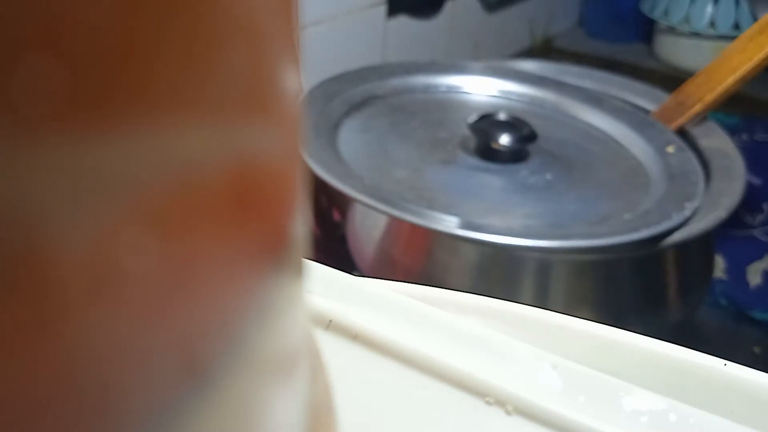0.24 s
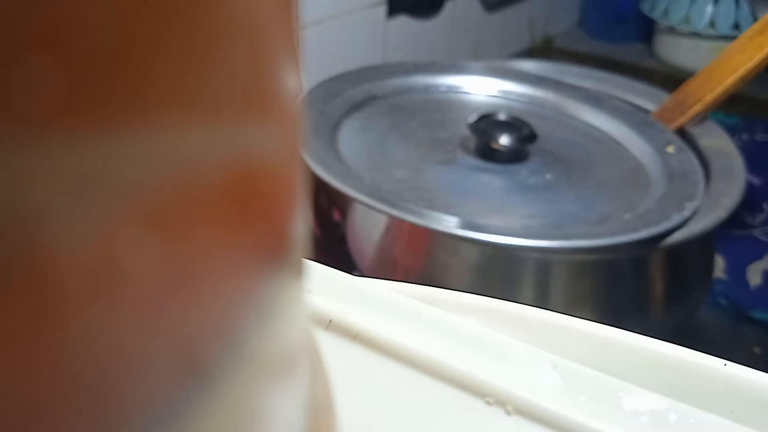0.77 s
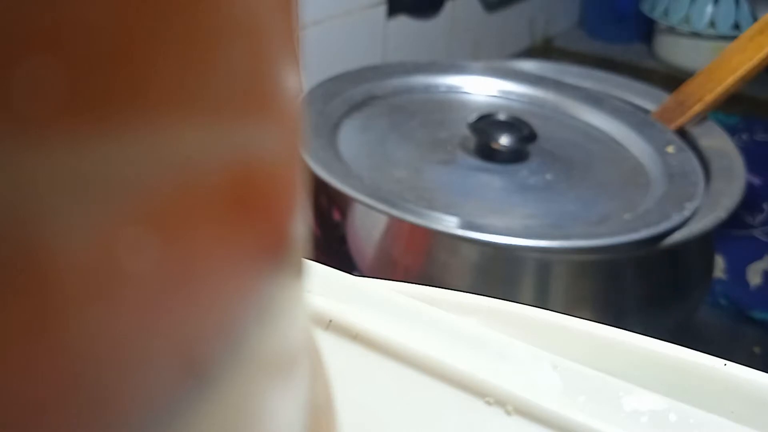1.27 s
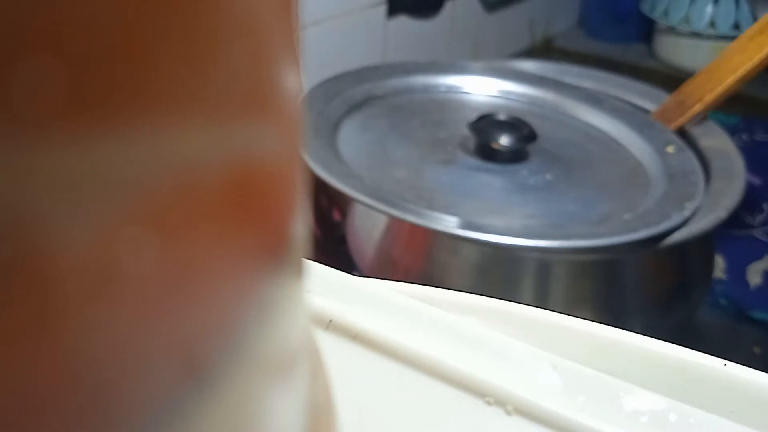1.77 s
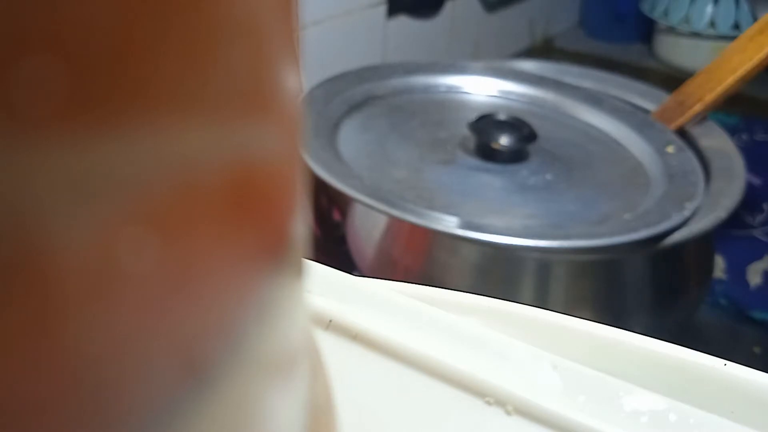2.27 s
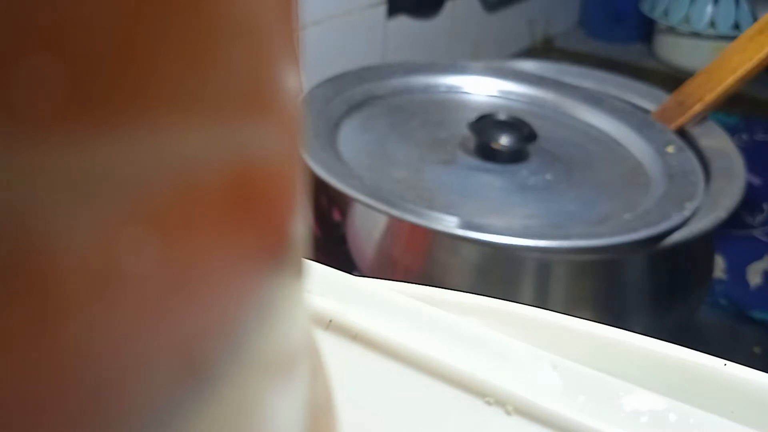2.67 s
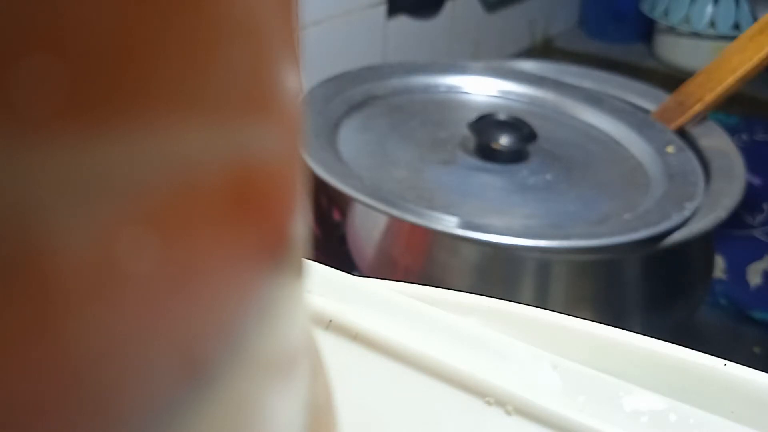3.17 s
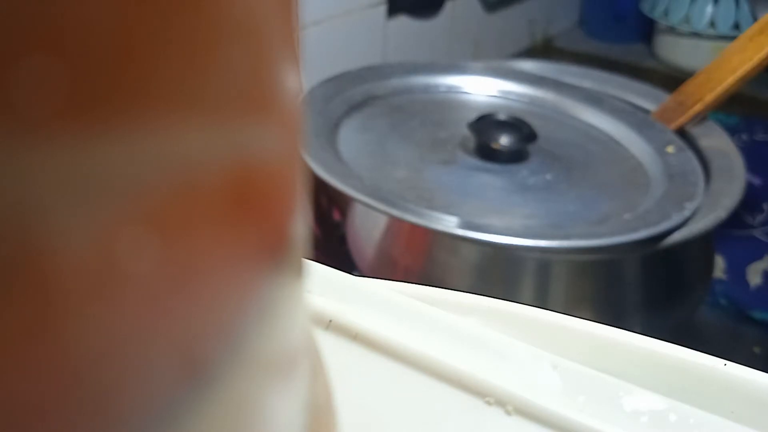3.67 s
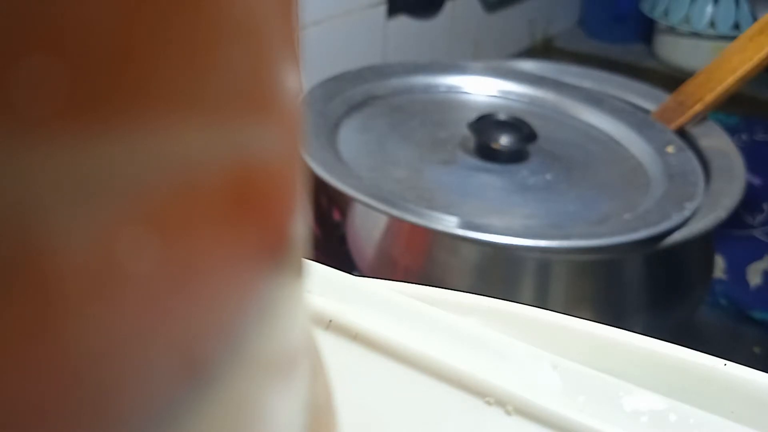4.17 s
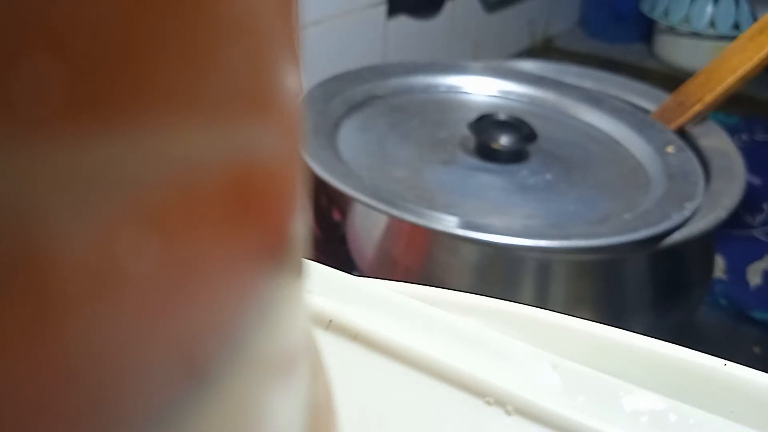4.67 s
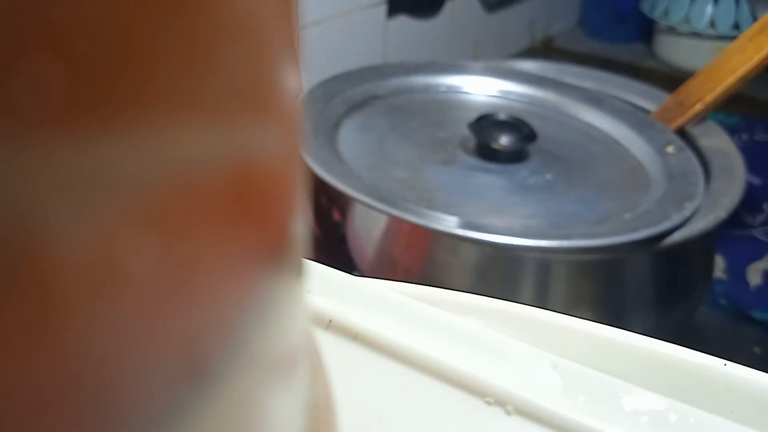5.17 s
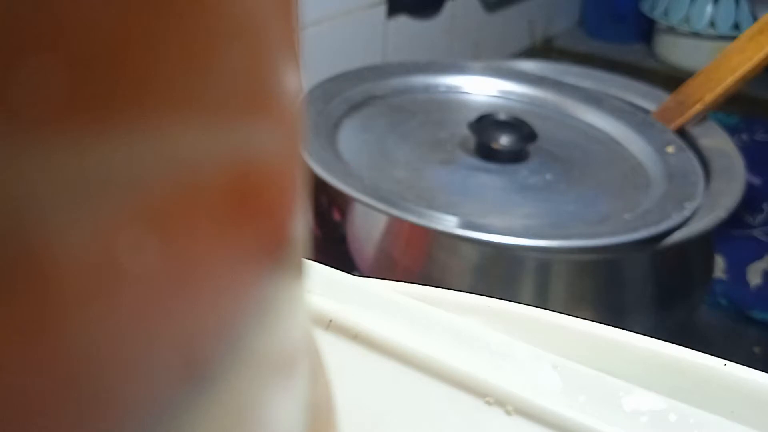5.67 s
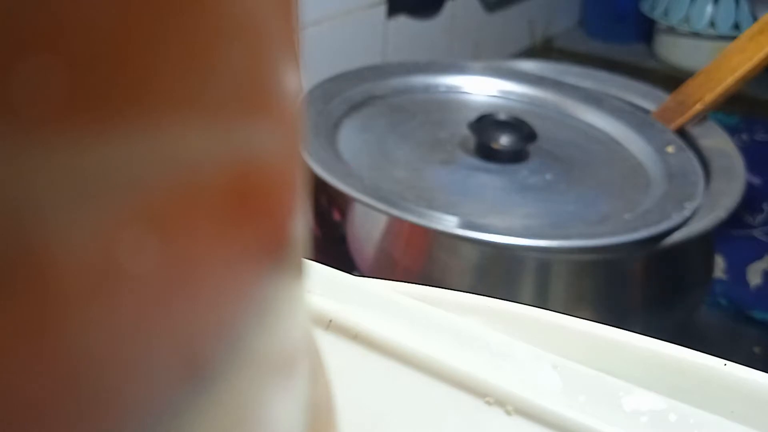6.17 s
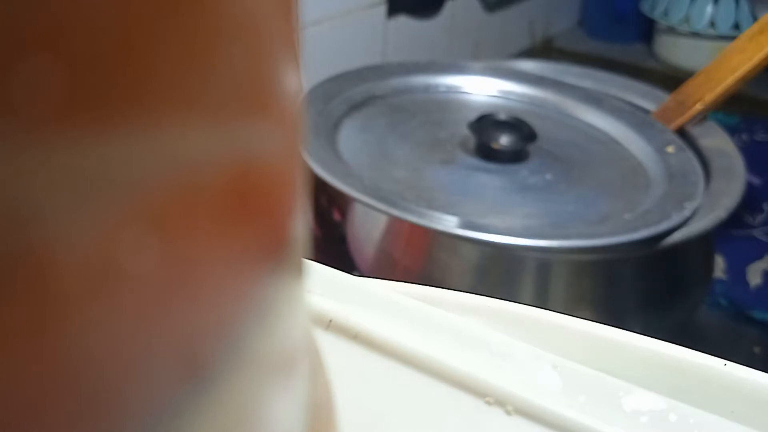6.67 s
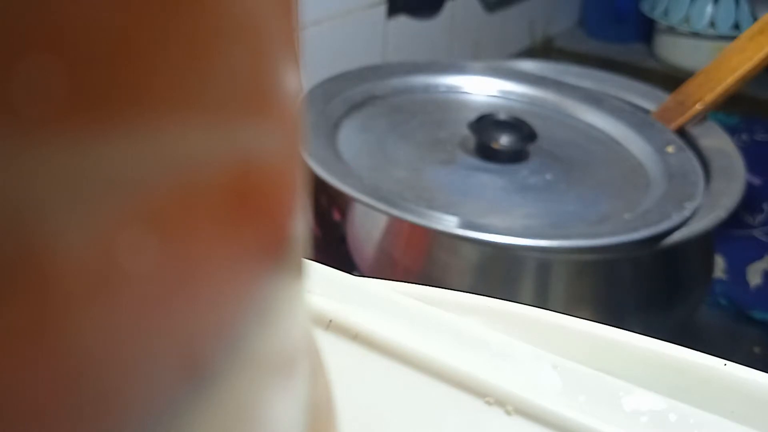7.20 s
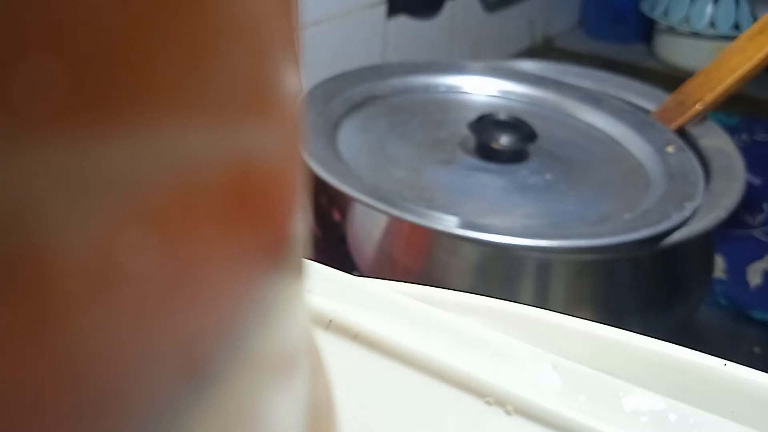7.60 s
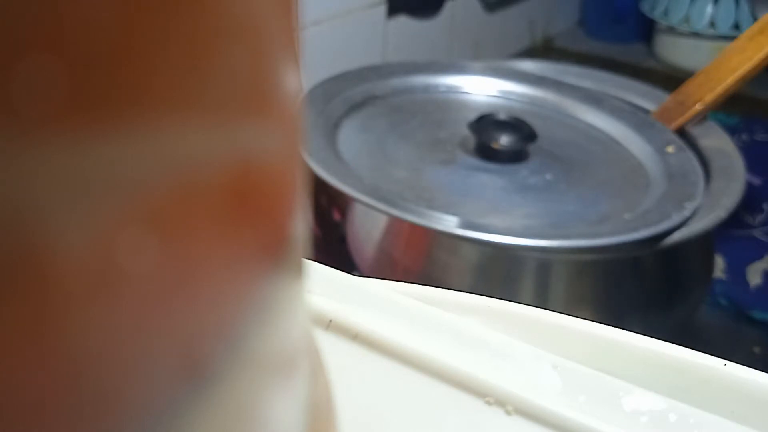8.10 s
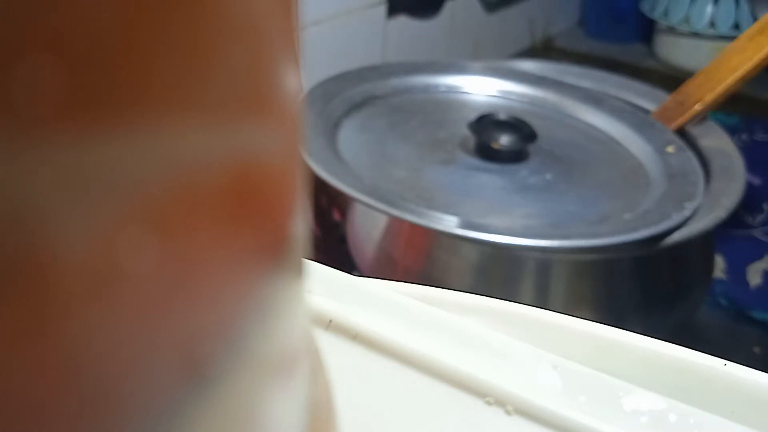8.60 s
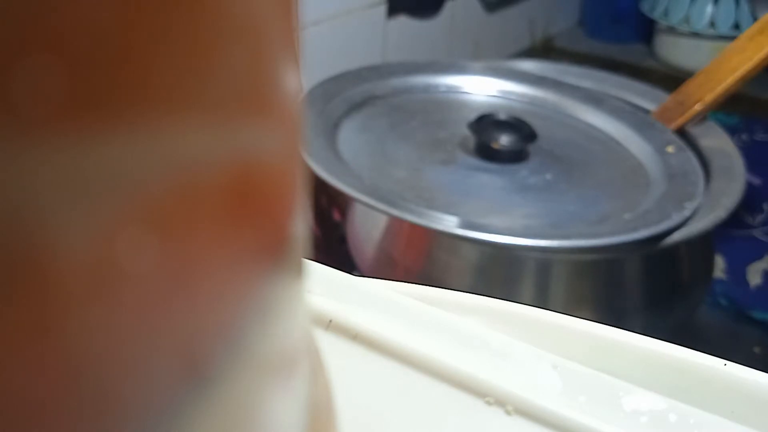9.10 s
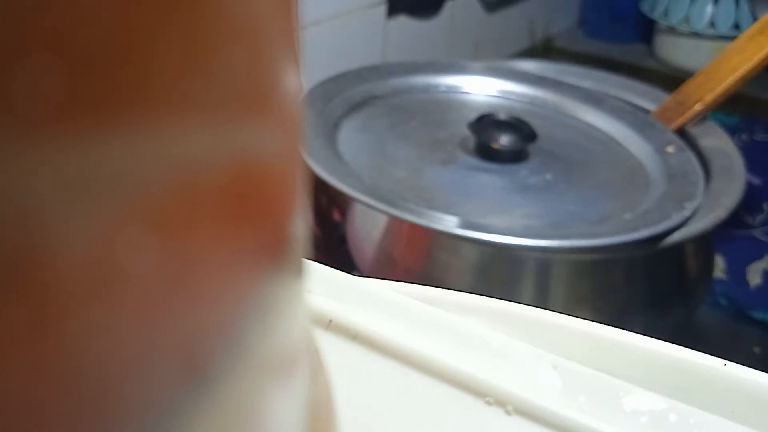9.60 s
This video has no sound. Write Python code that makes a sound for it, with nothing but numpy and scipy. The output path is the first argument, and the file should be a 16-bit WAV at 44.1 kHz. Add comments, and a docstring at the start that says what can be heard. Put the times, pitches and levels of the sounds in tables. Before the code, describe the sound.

From the start, water sizzles and bubbles in hot oil inside a covered steel pot, a dense fizz with a hollow metallic ring over a faint low rumble. Between about 0.4 and 1.6 seconds, steam lifts the lid several times, making small knocks with a soft boom and brief rattle. Round, soft glugs cluster in the first three seconds and then thin out. Small ringing pops and bright spits of oil are scattered throughout, the sharpest near 0.9, 1.7 and 6 seconds. Lighter lid bumps come around 3.8 and 6.2 seconds. The sizzle slowly calms, and from 6 to 8 seconds its ring turns slightly duller. The hardest lid thump lands at 7.5 seconds, followed by a light rattle near 8.2. The gentler sizzling continues to the end at about 10 seconds, all heard in mono from a phone on the kitchen counter.

```python
"""Water boils off fried onions in hot oil, in a steel pot whose lid rests ajar on a wooden spoon.
From the start, bursting bubbles sizzle and spray fizzes, ringing the steel and the air under the lid,
while steam thumps the lid several times in the first two seconds. Glugs, pops and spitting droplets
dot the sizzle as it slowly calms. From 6 to 8 s the pot cools to a duller ring, and the hardest
thump lands at 7.5 s. It is all heard in mono from a phone on the counter."""
import sys
import numpy as np
from scipy import signal
from scipy.fft import rfft, irfft
from scipy.io import wavfile
from scipy.ndimage import uniform_filter1d

SR = 44100
rng = np.random.default_rng(int(sys.argv[2]) if len(sys.argv) > 2 else 0)


def wav_record(signal):
    """Record a signal, one row per channel, as 16-bit PCM in the file named by sys.argv[1]."""
    frames = np.transpose(np.atleast_2d(signal))
    bounded = np.clip(frames, -1, 1)
    # unit amplitude maps onto the largest positive 16-bit level
    quanta = np.round(bounded * 32767).astype(np.int16)
    wavfile.write(sys.argv[1], SR, quanta)


N = 434385


def undb(db):
    """Decibels to gain."""
    return 10 ** (np.asarray(db) / 20)


def unit_rms(x):
    """Scale to rms 1."""
    return x / np.sqrt(np.mean(x ** 2))


def band(x, low_hz, high_hz):
    """Steep band-pass."""
    edges_hz = [low_hz, min(high_hz, .45 * SR)]
    return signal.sosfilt(signal.butter(3, edges_hz, "band", fs=SR, output="sos"), x)


def level_ride(table, column):
    """One column of a table as a fader ride, in dB around its mean."""
    rows = np.array(table)
    db = np.interp(np.arange(N) / SR, rows[:, 0], rows[:, column])
    return db - db.mean()


def wander(per_s):
    """Smooth random drift with a spread of 1: held steps, slewed twice."""
    hold = int(SR / per_s)
    steps = rng.standard_normal(N // 200)[np.arange(N) // hold]
    smooth = uniform_filter1d(uniform_filter1d(steps, hold), hold)
    return smooth / smooth.std()


def add(out, start_s, peak_db, sound):
    """Drop a sound into the mix at the given peak level."""
    place = out[int(start_s * SR):][:len(sound)]
    place += sound[:len(place)] * undb(peak_db) / np.abs(sound).max()


def noise_hit(pot, low_hz, high_hz, decay_ms, attack_ms=0.2):
    """A short puff of noise heard through one band of the pot's ring."""
    t_ms = np.arange(SR // 5) * 1000 / SR
    envelope = (1 - np.exp(-t_ms / attack_ms)) * np.exp(-t_ms / max(decay_ms, .3))
    return signal.fftconvolve(envelope * rng.standard_normal(len(t_ms)), band(pot, low_hz, high_hz))


# What leaks past the lid between the modes, coloured by the microphone: frequency_hz, relative_db
LID_LEAK = [(20, -51), (52, -51), (175, -34.5), (200, -25.5), (240, -21), (450, -20.5), (880, -21),
            (1500, -20), (3200, -23), (4300, -25), (4900, -23), (5200, -24.5), (6500, -21.5), (9000, -28),
            (12900, -37), (13800, -34), (14800, -28), (15800, -22.5)]
# Modes of the pot, lid and enclosed air: hot_pitch_hz, cooled_pitch_hz, width_hz, relative_db
POT_MODES = [(72.4, 81, 12, -26), (88.6, 100, 15, -19.5), (117.6, 120, 36, -17.5), (276, 266, 18, -6),
             (301.7, 302.6, 25.3, 2), (346, 345, 21, -3.5), (680, 790, 41, -17.5), (1063, 1060, 44, -18),
             (1173.7, 1166, 24, -7.5), (1210, 1209, 25.4, -3.5), (1288, 1289, 34, -10),
             (1350, 1350, 40, -16.5), (1586, 1585, 40, -16), (1628, 1622, 28, -12), (1874, 1875, 54, -13.5),
             (1940, 1915, 38, -12.5), (1999, 1960, 56, -6.5), (2075, 2040, 29, -13), (2280, 2020, 57, -19),
             (2341, 2325, 40, -9), (2428, 2420, 73, -13), (2520, 3600, 42, -21), (2709, 2682, 63, -13.5),
             (2860, 2880, 93, -14.5), (3010, 2990, 81, -14), (3428, 3400, 31, -14), (3557, 3520, 97, -14),
             (3950, 3760, 210, -24), (4183, 4150, 100, -15), (4470, 4440, 37, -15), (4572, 4520, 69, -13.5),
             (4880, 4730, 57, -16), (5503, 5420, 110, -18.5), (5670, 5580, 90, -19.5),
             (6030, 6000, 290, -19.5), (6270, 6180, 130, -19.5), (7030, 5900, 220, -22),
             (7320, 7300, 200, -23)]


def pot_response(cooled, leak_db=0, fft_size=16384):
    """The pot's impulse response, modes plus leak; as it cools the modes shift, most of them down."""
    hz = np.arange(fft_size // 2 + 1) * SR / fft_size + 1e-3
    leak_hz, leak_shape_db = np.array(LID_LEAK).T
    power = undb(leak_db + np.interp(np.log(hz), np.log(leak_hz), leak_shape_db)) ** 2
    for hot_pitch_hz, cooled_pitch_hz, width_hz, relative_db in POT_MODES:
        pitch_hz = cooled_pitch_hz if cooled else hot_pitch_hz
        if cooled and pitch_hz > 3250:  # the upper modes blur and dull
            width_hz *= 1.32
            relative_db -= 2.5
        # steel and air couple, so each peak has steeper skirts than a lone resonator
        power += undb(relative_db) ** 2 / (1 + (2 * (hz - pitch_hz) / width_hz) ** 2) ** 2
    # minimum phase: the ring follows the hit, never leads it
    half = fft_size // 2
    cepstrum = irfft(np.log(power) / 2)
    cepstrum[1:half] *= 2
    cepstrum[half + 1:] = 0
    return irfft(np.exp(rfft(cepstrum)))[:half]


# Low-end rides, each played around its mean: time_s, hollow_bubbling_db, shudder_db
LOW_RIDES = [(0, -42, -62), (.08, -48.5, -69), (.22, -46.5, -65), (.38, -49.5, -69), (.6, -45, -54),
             (.74, -44, -66), (.98, -46.5, -70), (1.18, -43, -58), (1.34, -49, -62), (1.7, -47.5, -57.5),
             (2.22, -49, -66), (2.8, -50.5, -66), (3.43, -50, -62.5), (3.81, -52, -64.5),
             (4.17, -46.5, -64.5), (4.61, -52.5, -63.5), (5.19, -50.5, -68), (6.17, -52.5, -68),
             (6.34, -54.5, -62.5), (6.99, -53.5, -68.5), (7.24, -52, -64.5), (7.43, -55, -67),
             (7.7, -52.5, -70), (8.4, -53.5, -60.5), (8.56, -49.5, -63.5), (9.05, -57, -68),
             (9.15, -51.5, -63.5), (9.6, -62.5, -66), (9.85, -53, -70)]


def shudder(pot):
    """The low bed of stove and counter: turbulence comes and goes, shaking the lowest modes."""
    level_db = -61 + 0.8 * level_ride(LOW_RIDES, column=2) + 2.5 * wander(per_s=8)
    rumble = signal.fftconvolve(rng.standard_normal(N), band(pot, low_hz=39.8, high_hz=172))[:N]
    return unit_rms(rumble) * undb(level_db)


# Soft, round glugs: start_s, level_db (before the trim)
GLUG_CUES = [(0.159, -40), (0.217, -36), (0.477, -39), (0.734, -41.5), (0.842, -36.5), (1.173, -35.5),
             (1.682, -36.5), (1.745, -37), (1.804, -41), (1.94, -35), (2.087, -37), (2.202, -39),
             (2.293, -36), (2.395, -35), (2.585, -37.5), (2.981, -39.5), (3.399, -40), (3.454, -39),
             (3.934, -40), (4.243, -35), (4.436, -41), (4.672, -40.5), (5.039, -41), (5.283, -40),
             (5.469, -40), (5.821, -46), (6.091, -43.5), (7.125, -42.5), (7.32, -42), (7.933, -42.5),
             (8.193, -44), (8.27, -43)]


def glugs(pot, trim_db=-2):
    """A large bubble heaves up and bursts, ringing the low air modes under the lid."""
    out = np.zeros(N)
    for start_s, level_db in GLUG_CUES:
        glug = noise_hit(pot, low_hz=243, high_hz=374, decay_ms=13, attack_ms=3.1)
        add(out, start_s, level_db + trim_db, glug)
    return out


# Larger, pitched pops: start_s, peak_db, pitch_hz
POP_CUES = [(.168, -46, 104), (.572, -31, 1200), (.808, -36, 2320), (.873, -39, 1300), (.89, -35, 1200),
            (1.069, -34, 4270), (1.176, -38, 3570), (1.379, -37, 3550), (1.411, -37, 3600),
            (1.567, -39, 1190), (1.811, -33, 4300), (1.83, -37, 4400), (1.879, -39, 3540),
            (1.957, -34, 2040), (2.262, -39, 4230), (2.345, -37, 1280), (3.415, -36, 4170),
            (3.521, -38, 4200), (3.76, -39, 2050), (3.845, -39, 3020), (3.862, -33, 6000),
            (4.01, -35, 6100), (4.217, -33, 2020), (4.725, -33, 3620), (4.929, -41, 2500),
            (5.237, -36, 3950), (5.466, -40, 4100), (6.262, -47, 109), (6.993, -33, 1990),
            (7.489, -36, 1250), (7.501, -36, 1230), (7.524, -38, 1190), (7.598, -34, 4100),
            (7.958, -35, 1960), (8.002, -36, 1300), (9.026, -35.5, 5900), (9.043, -36, 6000),
            (9.56, -39, 1450), (9.585, -38.5, 1300), (9.61, -37.5, 1393), (9.65, -39, 1400)]


def pops(ring_ms=26, band_ratio=1.31):
    """A pop rings the modes around its own pitch; oil on the steel soon damps them."""
    out = np.zeros(N)
    pot = pot_response(cooled=False, leak_db=-9.5)  # more ring, less leak past the lid
    damped = pot * np.exp(-np.arange(len(pot)) * 1000 / (ring_ms * SR))
    for start_s, peak_db, pitch_hz in POP_CUES:
        pop = noise_hit(damped, pitch_hz / band_ratio, pitch_hz * band_ratio, decay_ms=8.6)
        add(out, start_s, peak_db, pop)
    return out


# Single droplets spitting: start_s, snap_peak_db, body_offset_db
SPIT_CUES = [(0.0368, -37, -10), (0.0737, -34, -5.5), (0.8155, -37, -8), (0.8647, -24, -12), (.9, -31, -9),
             (1.1523, -30, -10), (1.5444, -35, -4), (1.7094, -24.5, -9), (2.4872, -32, -11),
             (3.7595, -38, 1), (4.0442, -36, -2), (4.4159, -32.5, -8), (4.725, -37, 0), (4.7345, -35, -2),
             (4.777, -35, 1), (4.9761, -35, -12), (5.1178, -30, -9), (5.2724, -36, -7), (5.5653, -35, -2),
             (5.9579, -27.5, -14), (5.973, -30, -14), (6.0078, -34, -10), (6.043, -33, -4),
             (6.328, -39, -4), (6.4537, -36, -9), (6.8148, -30.5, -5), (7.2519, -34, -7), (7.6575, -37, -6),
             (7.7478, -29, -8), (8.0042, -38, -8), (8.0426, -36, -11), (8.1717, -30, -11),
             (8.9989, -33, -6), (9.6834, -34.5, -9.5)]


def spits(pot, decay_ms=2.4):
    """A droplet explodes into spray: a bright snap and a lower body that rings the steel."""
    out = np.zeros(N)
    for start_s, snap_peak_db, body_offset_db in SPIT_CUES:
        add(out, start_s, snap_peak_db, noise_hit(pot, 7400, 19900, decay_ms))
        add(out, start_s, snap_peak_db + body_offset_db, noise_hit(pot, 3000, 6900, decay_ms))
    return out


# Big steam bubbles bursting under the lid: start_s, knock_db, boom_db, boom_ms, rattle_db, rattle_ms
THUMP_CUES = [(.43, -42, -44, 12, -44, 33), (.573, -49, -39, 13, -43, 22), (.876, -38, -36, 12, -37, 29),
              (.975, -52, -38, 110, -50, 30), (1.23, -49, -52, 11, -40, 20), (1.566, -39, -32, 63, -40, 49),
              (3.759, -49, -43, 13, -53.5, 25), (6.205, -51, -38, 27, -55, 25),
              (6.262, -48, -39, 19, -53, 25), (7.469, -27, -27.5, 14, -33.5, 30),
              (7.487, -41, -34, 21, -39, 27), (7.525, -46, -46, 15, -48, 33),
              (8.169, -44, -49, 11, -40, 95)]


def lid_thumps(pot, boom_hz=300, boom_attack_s=.0015):
    """The lid knocks on the rim and rattles on; the air under it booms and is soon let out."""
    out = np.zeros(N)
    t = np.arange(SR // 5) / SR
    knock = band(pot, 385, 990)
    air_tone = -np.sin(2 * np.pi * boom_hz * t) * (1 - np.exp(-t / boom_attack_s))
    for start_s, knock_db, boom_db, boom_ms, rattle_db, rattle_ms in THUMP_CUES:
        boom = air_tone * np.exp(-(t * 1000 / boom_ms) ** 2)
        add(out, start_s, knock_db, knock)
        add(out, start_s, boom_db, band(boom, 233, 1500))
        add(out, start_s, rattle_db, noise_hit(pot, 362, 900, rattle_ms))
    return out


def bubble_bursts(bursts_per_s, spread_db, flurry_db, smear_ms):
    """Bubbles burst at random, many small and few large, in flurries; each sprays a tail of noise."""
    chance = rng.random(N) * SR / bursts_per_s
    bursting = chance < 1
    size = np.minimum(-np.log(chance[bursting] + 1e-9), 3.4)  # exponential sizes, capped
    power = np.zeros(N)
    power[bursting] = undb(spread_db * size + flurry_db * wander(per_s=16)[bursting]) ** 2
    smeared = signal.lfilter([1], [1, -np.exp(-1000 / (smear_ms * SR))], power)
    return np.sqrt(smeared) * rng.standard_normal(N)


# How hard the pot boils, each ride played around its mean: time_s, sizzle_db, spray_db, main_ring_db
BOIL_RIDES = [(0, -43.5, -43, -47.5), (.19, -44, -45, -52), (.33, -43.5, -43.5, -44.5),
              (.52, -45, -44.5, -48), (.85, -44, -44, -49), (.95, -44.5, -45, -49.5),
              (1.12, -42.5, -43, -47), (1.4, -44.5, -41.5, -51), (1.45, -43, -43.5, -42),
              (1.53, -43, -43, -49), (1.67, -43.5, -43, -47.5), (2.19, -45, -44.5, -52),
              (2.45, -45, -45, -52), (2.88, -43.5, -45.5, -47.5), (3.18, -47, -48.5, -52),
              (3.35, -46, -46, -49), (3.62, -45, -46, -52), (3.68, -45.5, -48, -61),
              (3.81, -44.5, -46.5, -47), (3.89, -45.5, -46.5, -54), (4.25, -46, -47.5, -49),
              (4.33, -47, -48, -56), (4.42, -47.5, -48.5, -51.5), (4.53, -48.5, -49, -51),
              (4.69, -45, -46, -43), (4.8, -44.5, -47, -53), (4.86, -46, -49, -44),
              (5.07, -46.5, -46.5, -52.5), (5.16, -45.5, -47, -47.5), (5.6, -46.5, -47, -50.5),
              (6.11, -47.5, -46.5, -54.5), (6.8, -46.5, -47.5, -52), (7.35, -46.5, -47.5, -50),
              (7.42, -48, -48, -54), (7.6, -47.5, -48.5, -50), (7.68, -48.5, -48.5, -52.5),
              (8.31, -47.5, -49.5, -53), (8.8, -48.5, -49.5, -50.5), (9.19, -47, -48.5, -54.5),
              (9.74, -48.5, -50.5, -52.5), (9.85, -48.5, -47, -53)]
# Bubble layers from large to small, then sparse bright ticks:
# low_hz, high_hz, level_db, ride_db_per_db, bursts_per_s, spread_db, flurry_db, surge_db, smear_ms
BUBBLE_LAYERS = [(389, 920, -58, .5, 500, 1.7, 1.37, 1, 4.5),
                 (946, 1128, -60, .8, 700, 1.9, 1.4, 1.35, 2.6),
                 (1127, 1250, -51.3, 1.16, 200, 2.4, 2, .8, 2.5),
                 (1254, 1460, -55.5, .8, 700, 2, 1.3, .8, 2.6),
                 (1475, 2194, -49.3, 0.6, 800, 3, 1, 0.55, 4.2),
                 (2147, 3160, -51, 0.96, 1500, 1.9, 1.2, 0.47, 1.7),
                 (3230, 4830, -51.5, 1.32, 2300, 3.5, 0.9, 0.5, 3.7),
                 (5010, 5820, -53, 1, 830, 2.5, 1, 0.6, 3.9),
                 (5760, 6710, -51.5, 0.93, 820, 4, 1, 0.65, 7.2),
                 (6670, 8320, -53.5, 0.83, 1500, 3, 0.3, 0.66, 5),
                 (8270, 13500, -55.5, 0.95, 1500, 0.5, 0.4, 0.07, 5.1),
                 (12900, 16600, -54.5, 1.1, 1300, 2, 0.5, .7, 1.6),
                 (8000, 18400, -60.5, 1, 45, 6, 0.5, 0.4, 0.77)]
HOLLOW_LAYER = (164, 390, -51, 0.87, 320.5, 1, 0.9, 1, 2.5)  # the largest bubbles, same columns


def sizzle(hot_pot, cooled_pot, cooling_s=(5.997, 8.05), main_ring_hz=1200, spray_from_hz=4000):
    """Bubbles of each size ring their own band of the pot, which crossfades from hot to cooled."""
    fade_start, fade_end = (int(s * SR) for s in cooling_s)
    fade_angle = np.interp(np.arange(N) / SR, cooling_s, [0, np.pi / 2])
    hot_gain, cooled_gain = np.cos(fade_angle[:fade_end]), np.sin(fade_angle[fade_start:])
    rides = [level_ride(LOW_RIDES, column=1)]  # for the hollow layer
    for low_hz, high_hz, *_ in BUBBLE_LAYERS:
        if low_hz < main_ring_hz < high_hz:
            rides.append(level_ride(BOIL_RIDES, column=3))
        else:
            rides.append(level_ride(BOIL_RIDES, column=1 if low_hz < spray_from_hz else 2))
    surge = wander(per_s=9)  # all layers surge together
    out = np.zeros(N)
    for ride_db, layer in zip(rides, [HOLLOW_LAYER] + BUBBLE_LAYERS):
        low_hz, high_hz, level_db, ride_db_per_db = layer[:4]
        bursts_per_s, spread_db, flurry_db, surge_db, smear_ms = layer[4:]
        bursts = bubble_bursts(bursts_per_s, spread_db, flurry_db, smear_ms)
        hot_ring = signal.oaconvolve(bursts[:fade_end], band(hot_pot, low_hz, high_hz))
        cooled_ring = signal.oaconvolve(bursts[:N - fade_start], band(cooled_pot, low_hz, high_hz))
        ring = np.zeros(N)
        ring[:fade_end] = hot_ring[:fade_end] * hot_gain
        ring[fade_start:] += cooled_ring[:N - fade_start] * cooled_gain
        swell_db = .45 * wander(per_s=7)  # each layer also swells on its own
        out += unit_rms(ring) * undb(level_db + ride_db_per_db * ride_db + surge_db * surge + swell_db)
    return out


def scene():
    """Shudder and sizzle run throughout and the one-shots land on top, alike in both channels."""
    hot_pot, cooled_pot = pot_response(cooled=False), pot_response(cooled=True)
    steady = shudder(hot_pot) + sizzle(hot_pot, cooled_pot)
    mono = steady + lid_thumps(hot_pot) + glugs(hot_pot) + spits(hot_pot) + pops()
    return np.array([mono, mono])


def record(dry):
    """The phone cuts the top end with a steep low-pass."""
    cutoff_hz = 15740
    return signal.sosfilt(signal.ellip(16, .2, 80, cutoff_hz, fs=SR, output="sos"), dry)


dry = scene()
out = record(dry)
wav_record(out)
```